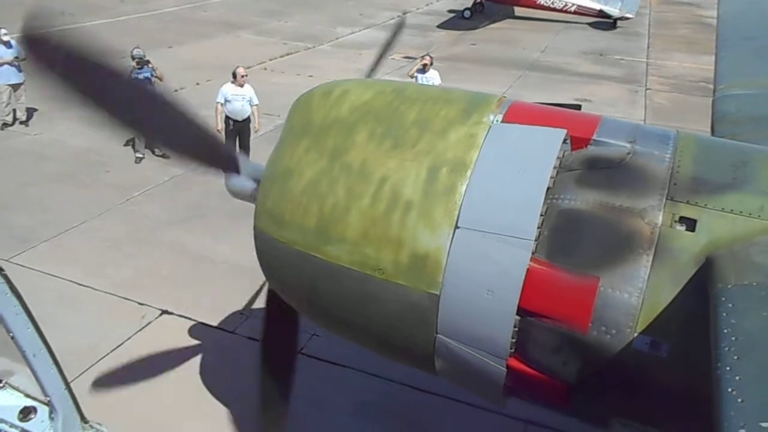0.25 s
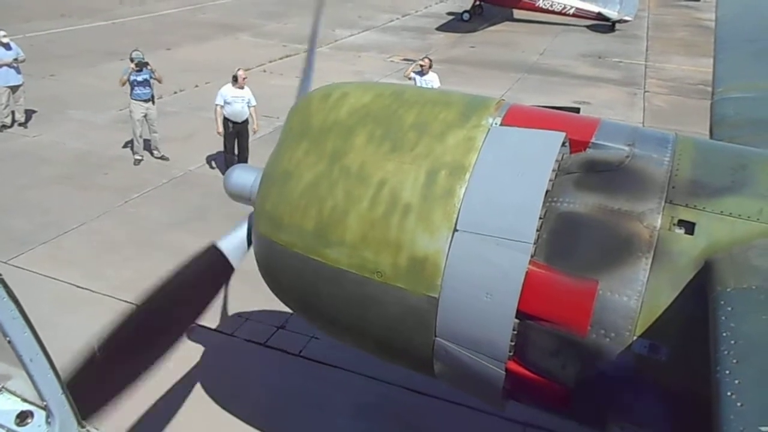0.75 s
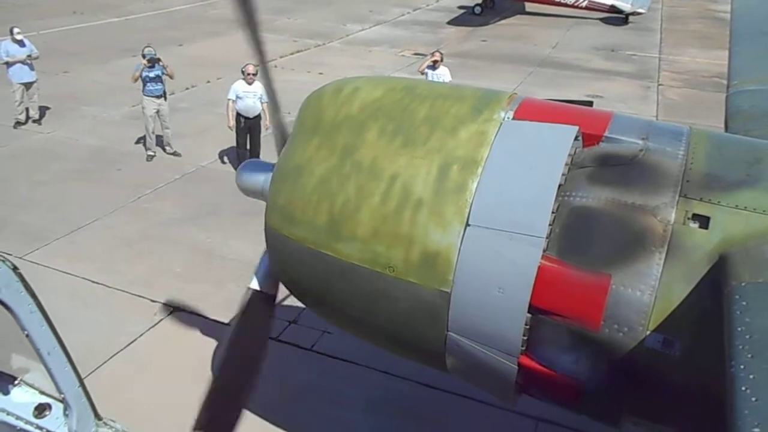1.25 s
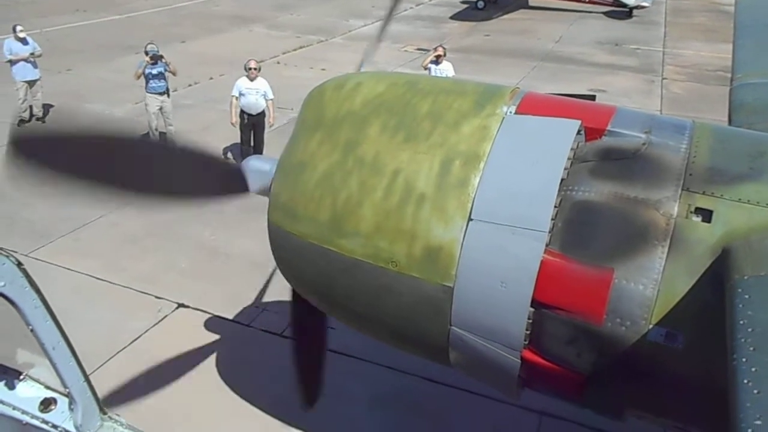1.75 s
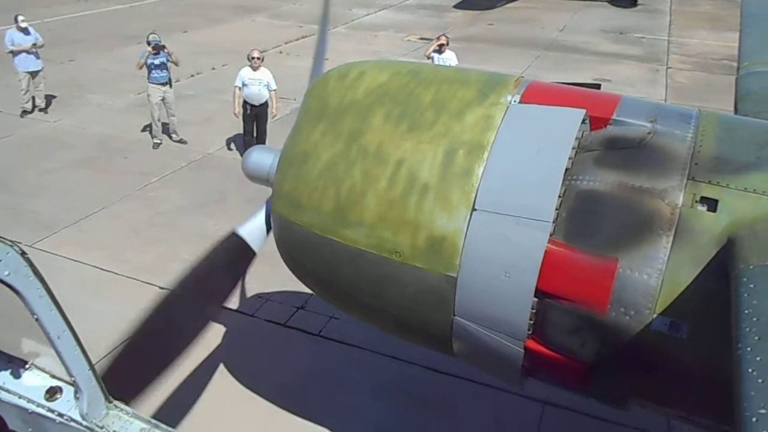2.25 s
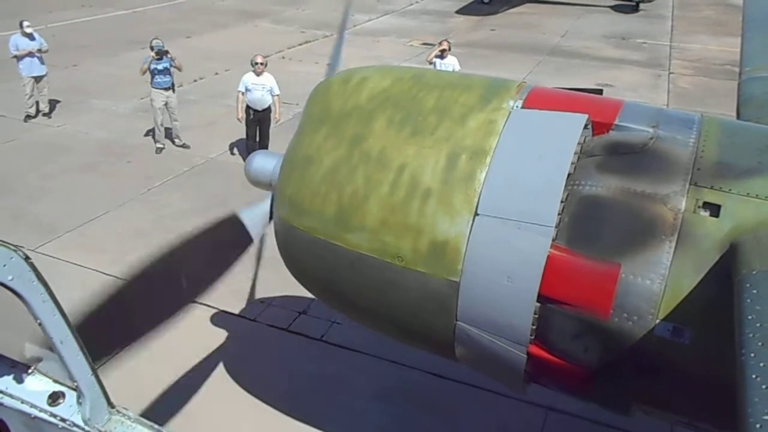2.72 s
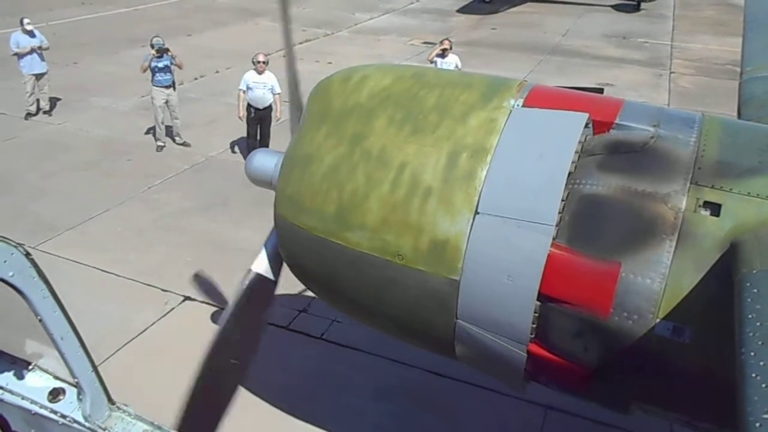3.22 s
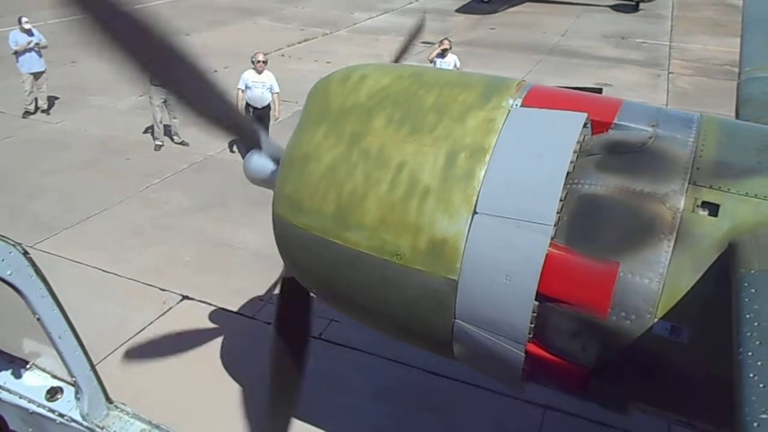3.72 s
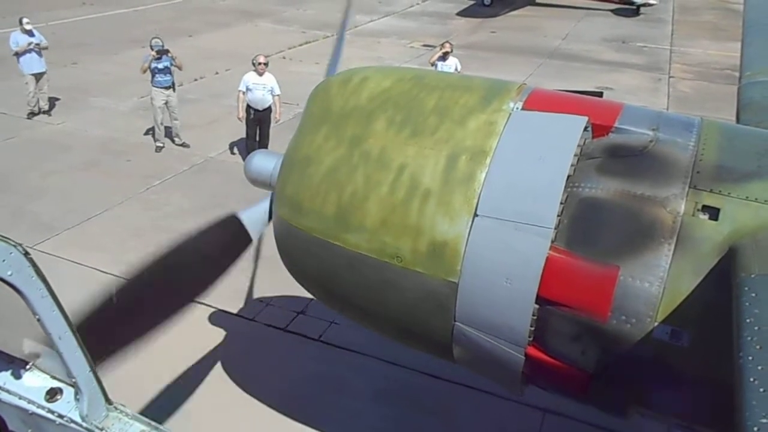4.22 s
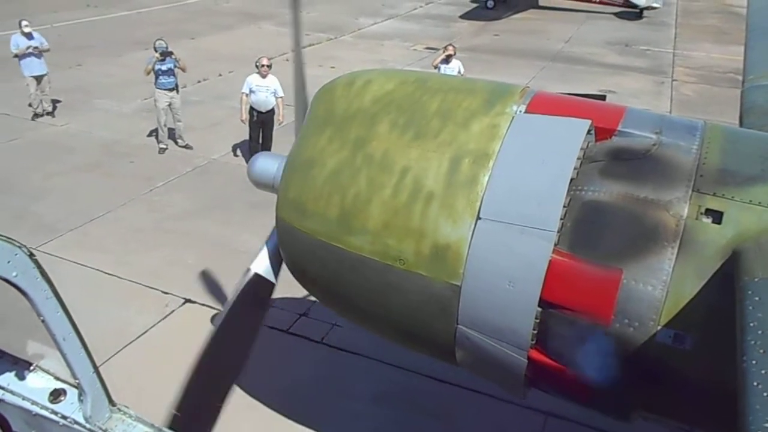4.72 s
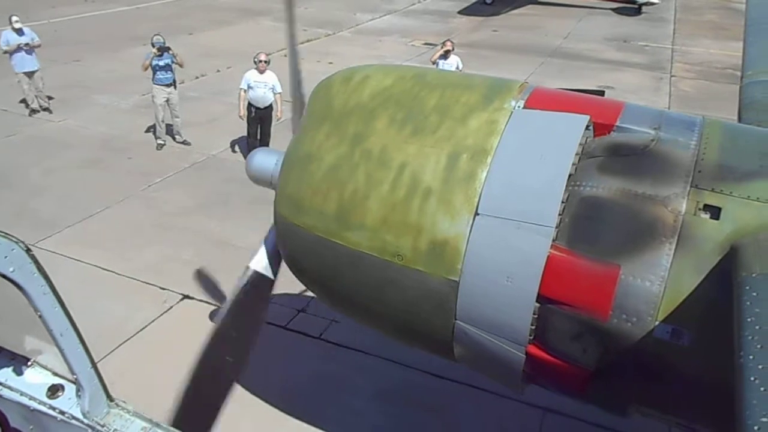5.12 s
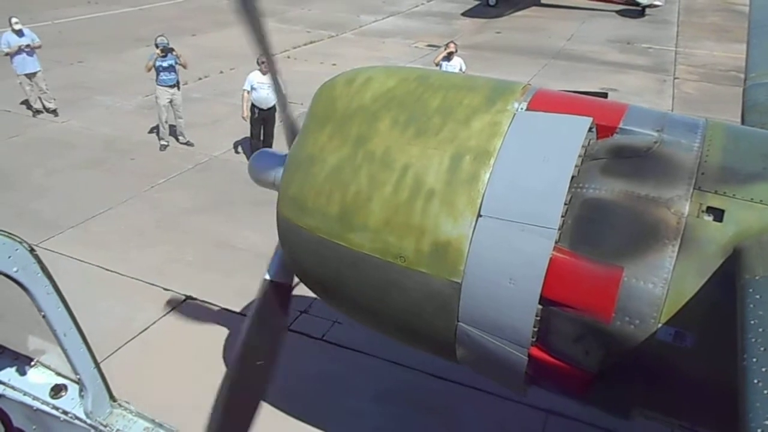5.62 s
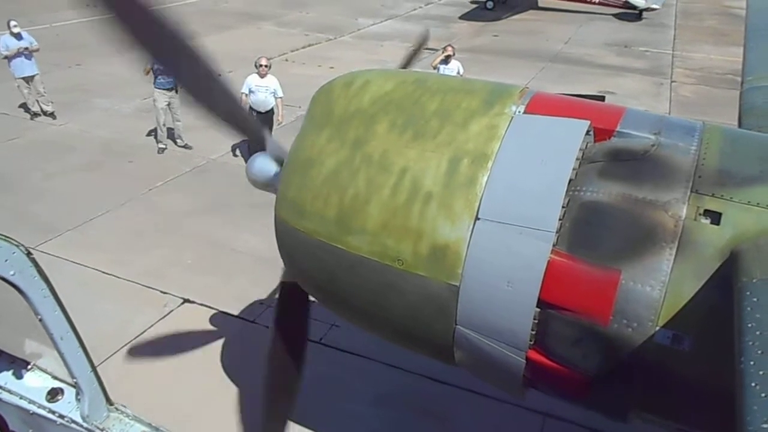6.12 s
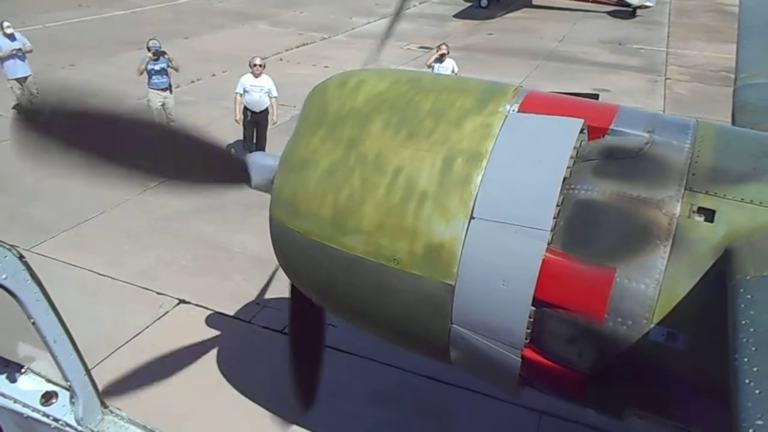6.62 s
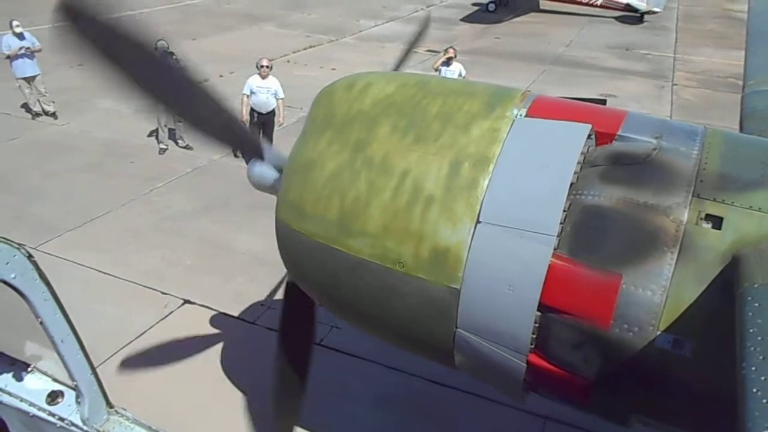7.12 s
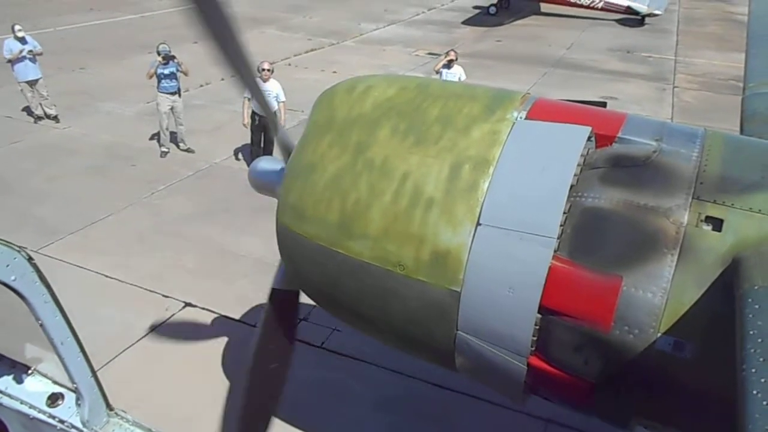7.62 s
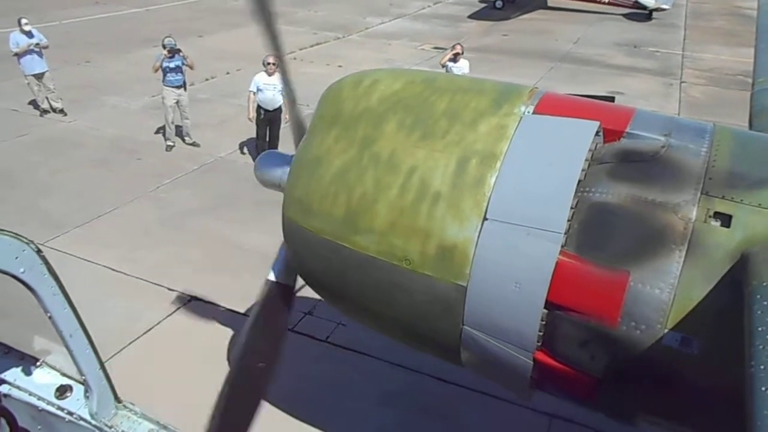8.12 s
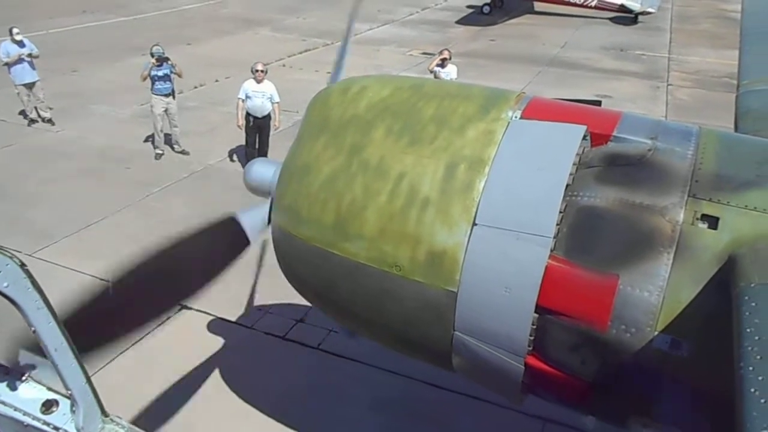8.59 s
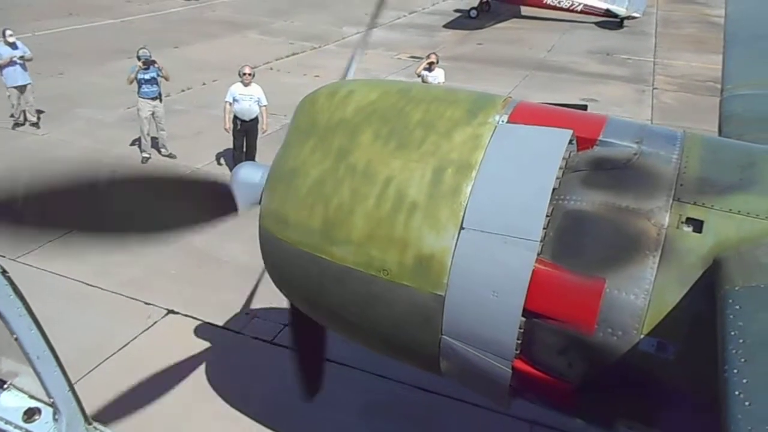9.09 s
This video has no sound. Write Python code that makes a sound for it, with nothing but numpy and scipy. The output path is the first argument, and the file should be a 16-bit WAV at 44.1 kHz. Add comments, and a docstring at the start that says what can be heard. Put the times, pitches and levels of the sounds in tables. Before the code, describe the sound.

A big radial piston aircraft engine idles unevenly up close, with ringing exhaust thuds, raspy gas spits, low boom and gusting propeller wash.

```python
"""A fourteen-cylinder radial aircraft engine idles on a concrete ramp, heard from the open cockpit.
It starts near 673 rpm and soon settles around 690; the first cylinder misses after about a second.
Seven near exhaust stacks limp through a pattern of two crank turns: ringing thuds, then spits of jet noise.
Seven duller far stacks, a boom of summed sines and gusting, noise-made propeller wash run underneath.
From about five seconds the idle creeps up unevenly to 738 rpm, with more misses on the way."""
import sys
import numpy as np
from scipy import signal
from scipy.fft import rfft, irfft, next_fast_len
from scipy.io import wavfile

SR = 44100
rng = np.random.default_rng(int(sys.argv[2]) if len(sys.argv) > 2 else 0)


def put_to_file(sound):
    """Save the sound as 16-bit audio at rate SR, in the file named by the first command-line argument."""
    columns = np.atleast_2d(sound).T  # one column per channel
    safe = np.clip(columns, -1, 1)
    whole_steps = np.round(safe * 32767)
    wavfile.write(sys.argv[1], SR, whole_steps.astype(np.int16))


N = 412335
TIME = np.arange(N) / SR


def amp(db):
    """Decibels to gain."""
    return np.exp(np.asarray(db) * (np.log(10) / 20))


def evened(x):
    """Scales to an rms of one."""
    return x / np.sqrt(np.mean(x ** 2) + 1e-20)


def curve(rows, t):
    """Reads a table of (t/s, value) at the times t."""
    return np.interp(t, *np.transpose(rows))


def colour(x, points):
    """Filters by a spectrum of (f/Hz, level/dB) points, joined on a log-frequency axis."""
    size = next_fast_len(len(x), real=True)
    hz, db = np.transpose(points)
    bins = np.fft.rfftfreq(size, 1 / SR)
    gain = amp(np.interp(np.log(bins + 1), np.log(hz + 1), db))
    return irfft(rfft(x, size) * gain, size)[:len(x)]


def band(x, hz, kind):
    """A gentle low-pass or high-pass."""
    sos = signal.butter(2, min(hz, SR / 2 - 1), kind, fs=SR, output="sos")
    return signal.sosfilt(sos, x)


def wander(per_s):
    """Random drift of rms one, with per_s new values a second joined by straight lines."""
    steps = rng.standard_normal(N // 8)
    return evened(np.interp(TIME * per_s, np.arange(len(steps)), steps))


def add(mix, s, sound):
    """Mixes a sound in at a time in seconds."""
    part = mix[max(round(s * SR), 0):][:len(sound)]
    part += sound[:len(part)]


# near stacks: valve opens/share of cycle, thud level/dB before effort, pipe note f/Hz, ring t60/s,
# slap level/dB and bark level/dB against the ring, spit delay t/s, spit length t/s,
# spit level/dB before effort
NEAR_STACKS = [ (0.031, -19, 261, 0.029, -42, -14, 0.0045, 0.021, -18.5),
               (0.22, -23, 151, 0.013, -9.5, -5, .0000, 0.024, -27),
               (0.303, -19.5, 281, 0.03, -20, -5, 0.0021, 0.021, -16.5),
               (0.471, -20, 256, 0.033, -17, -14.5, 0.0027, .0210, -17.5),
               (0.591, -22, 326, 0.039, -36, -15, 0, 0.027, -22.5),
               (0.745, -21, 335, 0.034, -6.5, -5.5, 0.0033, 0.022, -18.5),
               (0.859, -17.5, 260, 0.021, -7, -20, 0.0028, 0.021, -22.5)]
# colour of the gas jet of each near stack, in the same order: f/Hz, level/dB
NEAR_JET_1 = [(450, -27), (1040, -4), (1160, -20.5), (1430, -2), (1930, -5.5), (2210, 3), (2390, -5.5),
              (2630, 3), (2890, -3), (3160, 2.5), (4290, -4.5), (5040, 2), (5400, -4), (10100, 4.5)]
NEAR_JET_2 = [(450, -20), (590, -2), (820, -47), (930, -2), (1670, -15), (2210, -5.5), (2630, -17),
              (2890, 5), (3160, 2), (3740, -8), (5670, 8.5), (6140, 0.5), (7570, 1), (10100, -6.5)]
NEAR_JET_3 = [(450, -8.5), (620, -7.5), (820, -14), (1620, -6), (1720, -13.5), (2390, -2.5), (2760, -13.5),
              (3030, -4), (4700, 0.5), (5400, -6.5), (6140, 0), (6430, -8), (8000, 4), (10100, -0.5)]
NEAR_JET_4 = [(450, -16), (820, -9.5), (1290, -26.5), (1430, -10.5), (1720, -18), (2330, -16), (2570, -3),
              (3300, -2), (3590, 0), (4210, -6.5), (4610, -1), (6840, -12), (8110, -3.5), (10100, -6.5)]
NEAR_JET_5 = [(450, -11), (560, -17), (1040, -2.5), (1210, -35), (1430, -1.5), (1770, -3.5), (1930, -5.5),
              (2390, -2), (2700, -8), (3160, -2.5), (4130, -5), (7250, 0), (7570, 3.5), (10100, 0)]
NEAR_JET_6 = [(450, -1), (650, -8), (850, -29), (1120, 2.5), (1290, -22), (1570, 3.5), (1770, -13.5),
              (2450, -6.5), (2700, -1), (3370, -5.5), (3590, 3), (5040, -2), (8000, 2.4), (10100, 0.5)]
NEAR_JET_7 = [(450, 6.5), (590, 1), (750, 1), (1250, -17), (1480, 7), (1670, -17), (1880, 4), (2100, -16),
              (2390, -1), (2510, -5), (6340, 6), (6630, 2), (8790, 7.5), (10100, 2.5)]


def near_stacks(near):
    """Every firing of a near stack knocks in its pipe, then blows out a spit of gas."""
    jets = (NEAR_JET_1, NEAR_JET_2, NEAR_JET_3, NEAR_JET_4, NEAR_JET_5, NEAR_JET_6, NEAR_JET_7)
    knocks, gas = np.zeros((2, N))
    for (times, db), stack, jet in zip(near, NEAR_STACKS, jets):
        _, thud_db, pipe_hz, t60, slap_db, bark_db, delay, length, spit_db = stack
        # even a weak firing pushes its charge out, so the thud varies less than the spit
        knocks += thuds(times, thud_db + 0.61 * db, pipe_hz, t60, slap_db, bark_db)
        gas += spits(times + delay, spit_db + db, length, jet)
    return knocks, gas


# turbulence of the bark: f/Hz, level/dB
BARK = [(100, -18), (260, -2.0), (420, -4), (630, -1.0), (850, -14.5), (1150, -10), (3000, -40)]


def thuds(times, db, pipe_hz, t60, slap_db, bark_db, rise=0.0031, slap_at=0.00307, slap_width=0.00071,
          jitter=0.00028, detune=0.019, spread_db=0.0):
    """Each opening valve sends a steep pressure slap down its pipe, which rings briefly with a turbulent bark."""
    out = np.zeros(N)
    t = np.arange(SR // 14) / SR
    shape = (1 - np.exp(-(t / rise) ** 2)) * amp(-60 * t / t60)
    front = (t - slap_at) / slap_width
    slap = (1 - front ** 2) * np.exp(-front ** 2 / 2)
    churn = evened(colour(rng.standard_normal(2 * SR), BARK))
    chances = rng.standard_normal((len(times), 3))
    for s, level, (late, heat, size) in zip(times, db, chances):
        # hotter gas raises the note of the pipe
        ring = -np.sin(2 * np.pi * pipe_hz * (1 + detune * heat) * t)
        bark = churn[rng.integers(len(churn) - len(t)):][:len(t)]
        thud = shape * (ring + amp(bark_db) * bark) + amp(slap_db) * slap
        add(out, s + jitter * late, 2 * amp(level + spread_db * size) * thud)
    return out


def spits(times, db, length, jet, skew=0.8, tail=0.0046, tail_share=0.078, rasp_focus=0.72, rasp_db=1.2,
          jitter=0.00055, crackle_db=1.5):
    """Gas tears out while the valve is open: a hump of jet noise whose rasp varies from shot to shot."""
    t = np.arange(SR // 20) / SR
    hump = np.sin(np.pi * np.minimum(t / length, 1) ** skew) ** 2
    # the airframe scatters a short tail after each spit
    scatter = np.convolve(hump ** 2, np.exp(-t / tail))[:len(t)] / (tail * SR)
    shape = np.sqrt(hump ** 2 + tail_share * scatter)
    rasp_level, fizz_level = np.zeros((2, N))
    chances = rng.standard_normal((len(times), 2))
    for s, level, (late, tint) in zip(times, db, chances):
        # rasp and fizz follow slightly different swells, and trade level from shot to shot
        add(rasp_level, s + jitter * late, amp(level + rasp_db * tint) * shape ** rasp_focus)
        add(fizz_level, s + jitter * late, amp(level - 0.21 * rasp_db * tint) * shape)
    eddies = rng.standard_normal(N) * amp(crackle_db * wander(1800))
    jet_noise = colour(eddies, list(jet) + [(13000, -3.5), (16000, -35)])
    gas = evened(band(jet_noise, 380, "highpass"))
    rasp = colour(gas, [(4000, -6.5), (6000, -1.5), (8000, -42)])
    fizz = gas - rasp
    return rasp * rasp_level + fizz * fizz_level


# a cylinder fails to catch: valve opens t/s, level/dB against a usual firing
MISSED_FIRINGS = [(1.148, -26), (3.523, -5.5), (3.855, -16), (3.869, -9), (5.617, -6), (6.003, -29),
                  (6.531, -18), (7.461, -25), (7.973, -41)]
# a cylinder fires harder than usual: valve opens t/s
STRONG_FIRINGS = [0.737, 1.099, 2.093, 3.619, 5.882, 6.174, 7.197, 8.616, 9.173]
HARD_DB = 3.5  # above a usual firing


def near_firings(cycles):
    """Firings of each near stack; a hard firing or a miss falls on the cylinder whose turn it is."""
    times, db = map(list, zip(*(firings(cycles, stack[0]) for stack in NEAR_STACKS)))
    odd_firings = list(MISSED_FIRINGS) + [(s, HARD_DB) for s in STRONG_FIRINGS]
    for s, odd_db in odd_firings:
        stack = np.argmin([abs(t - s).min() for t in times])
        turn = np.argmin(abs(times[stack] - s))
        db[stack][turn] = curve(EFFORT_CURVE, s) + odd_db
    return list(zip(times, db))


# strength of combustion: t/s, level/dB
EFFORT_CURVE = [(0.0, 1.2), (0.7, 0.9), (1.7, 0), (4.6, 0.6), (5.1, -0.9), (5.7, 1.4), (6.5, -0.3),
                (8.1, 1), (9.35, 1.1)]


def firings(cycles, share, spread_db=0.97):
    """Times at which one cylinder fires, and the strength of each firing in dB."""
    times = np.interp(np.arange(share, cycles[-1]), cycles, TIME)
    return times, curve(EFFORT_CURVE, times) + spread_db * rng.standard_normal(len(times))


# engine speed, an idle that creeps up unevenly in the second half: t/s, speed/rpm
IDLE_SPEED = [(0.0, 673.1), (0.2, 688.6), (2.23, 693.7), (4.8, 693.4), (5.44, 710.1), (6.37, 704.2),
              (6.97, 728.4), (7.87, 733.3), (8.07, 719.3), (9.35, 738.3)]


def crankshaft():
    """Counts engine cycles of two crank turns each."""
    return np.cumsum(curve(IDLE_SPEED, TIME)) / (120 * SR)


# far stacks, shielded by the cowling: valve opens/share of cycle, thud level/dB before effort, pipe note f/Hz
SHIELDED_STACKS = [(0.101, -43, 182), (0.166, -28.5, 207), (0.439, -24.5, 373), (.545, -40.5, 273),
                   (.660, -27, 269), (.800, -36.5, 246), (0.986, -24, 226.5)]


def far_stacks(cycles):
    """Behind the cowling only the thuds of the pipes are heard, without spits."""
    knocks = np.zeros(N)
    for share, thud_db, pipe_hz in SHIELDED_STACKS:
        times, db = firings(cycles, share)
        knocks += thuds(times, thud_db + db, pipe_hz, t60=0.035, slap_db=-19, bark_db=-11.5)
    return knocks


# cockpit resonances: f/Hz, width f/Hz, level/dB of the added hum
COCKPIT_MODES = [(234, 7.5, -1), (255, 15.7, -1), (371, 41, -12), (633, 31, 2.5)]


def cockpit(x):
    """The cockpit well hums along at a few resonances."""
    hums = (amp(db) * signal.lfilter(*signal.iirpeak(hz, hz / width, SR), x)
            for hz, width, db in COCKPIT_MODES)
    return x + sum(hums)


# boom of exhaust and propeller: multiple of the cycle rate, rms level/dB before effort, waver and lulls
BOOM_ORDERS = [(3, -32.7), (4, -35.8), (5, -40.9), (6, -48.5), (7, -30.1), (8, -44.3), (9, -44.0),
               (11, -46.4), (13, -50.3), (14, -33.1), (15, -45.4), (16, -33.4), (18, -44.1), (19, -50.0),
               (20, -41.5), (21, -50.0), (23, -41.8), (25, -44.4), (27, -48.1)]


def boom(cycles, near, suck=0.015, swell=.095, waver=0.078, miss_depth=0.34):
    """Low orders of the cycle, phased so that pressure dips as a valve opens, then swells; a miss makes it sag."""
    opens = np.array([stack[0] for stack in NEAR_STACKS])
    size = amp([stack[1] for stack in NEAR_STACKS])
    out = np.zeros(N)
    for order, db in BOOM_ORDERS:
        spin = -2j * np.pi * order
        pulses = np.exp(spin * (opens + swell)) - np.exp(spin * (opens + suck))
        timing = np.angle(np.sum(size * pulses))
        out += np.sqrt(2) * amp(db) * np.cos(2 * np.pi * order * cycles + timing)
    sag = 1 - miss_depth * lulls(near)
    return out * amp(curve(EFFORT_CURVE, TIME)) * (1 + waver * wander(8.3)) * sag


def lulls(near):
    """A smooth 40 ms hump from each near firing weaker than -7 dB; close misses add up."""
    missed = np.zeros(N)
    for times, db in near:
        for s in times[db < -7]:
            add(missed, s, np.hanning(SR // 25))
    return missed


# colour of the air rushing from the propeller: f/Hz, level/dB
WASH_COLOUR = [(8, -18), (20, -15), (42, -7), (62, -7), (90, 0), (135, -2), (190, 0.5), (260, -2.5),
               (420, -11), (850, -16.5), (1100, -14.5), (2000, -18.5), (5000, -15.5), (7500, -17.5),
               (10000, -34)]


def wash(cycles, near, miss_db=-4, level_db=-34, gust_db=2.4, beat=0.042):
    """Propeller wash gusts, pulses as the blades pass four times a cycle, and thins at a miss."""
    air = evened(colour(rng.standard_normal(N), WASH_COLOUR))
    blades = np.sin(2 * np.pi * 4 * cycles)
    flow_db = level_db + gust_db * wander(8.6) + curve(EFFORT_CURVE, TIME) + miss_db * lulls(near)
    return air * amp(flow_db) * (1 + beat * blades)


def scene():
    """All stacks, the boom and the wash follow one crankshaft."""
    cycles = crankshaft()
    near = near_firings(cycles)
    knocks, gas = near_stacks(near)
    knocks += far_stacks(cycles)
    knocks = band(cockpit(knocks), 77, "highpass")
    exhaust = amp(-2.0) * knocks + amp(-0.32) * gas
    return (exhaust + boom(cycles, near) + wash(cycles, near))[None]


# top end of the microphone: f/Hz, level/dB
MICROPHONE_TOP = [(9900, 0.5), (10400, -3), (11000, -18.5), (11700, -15.5), (12200, -26), (12600, -45)]
EDGE_HZ = 12800  # band limit


def record(dry):
    """A small microphone with a dull top, then a steep low-pass at the band limit."""
    heard = colour(dry[0], MICROPHONE_TOP)
    low_pass = signal.firwin(511, EDGE_HZ, window=("kaiser", 9), fs=SR)
    return signal.oaconvolve(heard, low_pass, "same")[None]


dry = scene()
out = record(dry)
put_to_file(out)
```